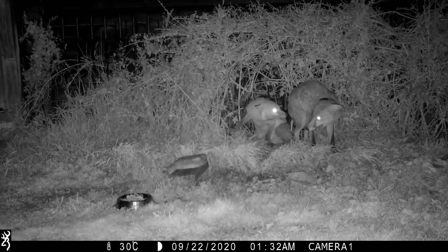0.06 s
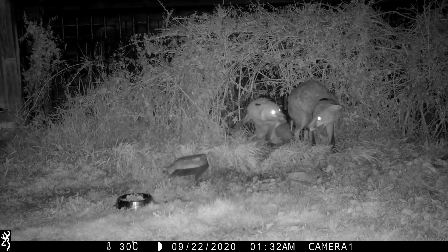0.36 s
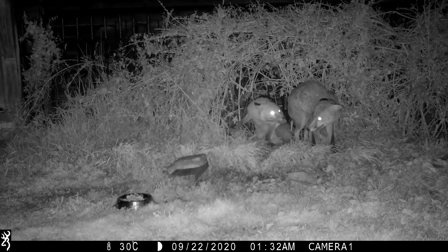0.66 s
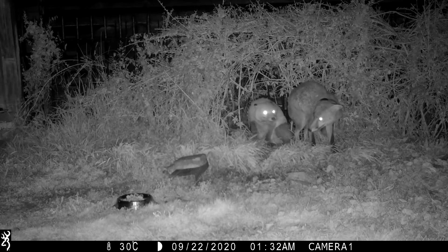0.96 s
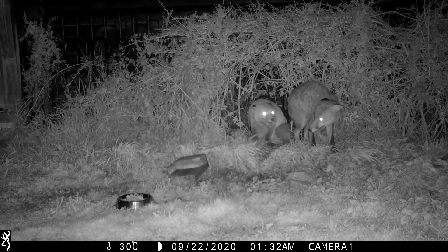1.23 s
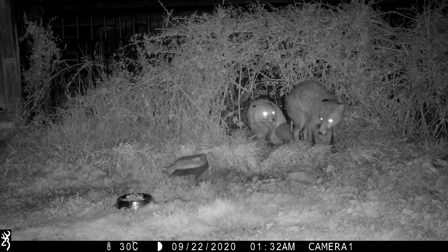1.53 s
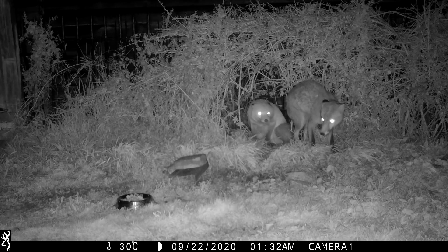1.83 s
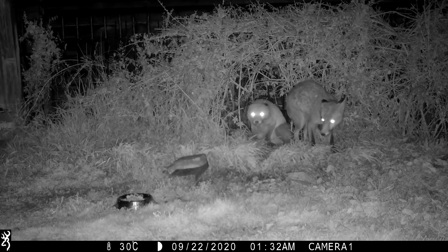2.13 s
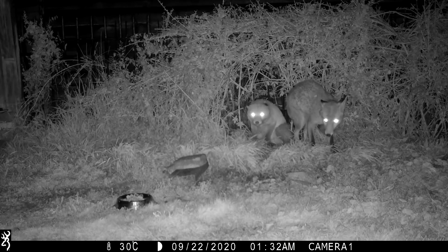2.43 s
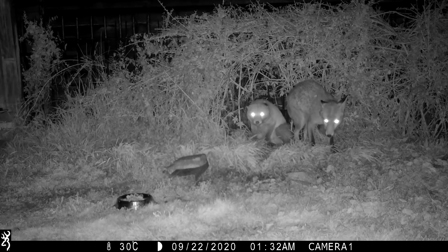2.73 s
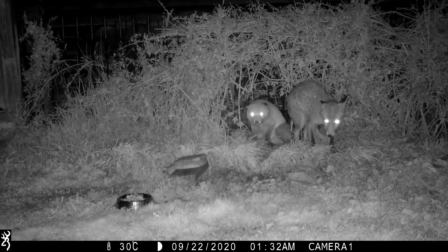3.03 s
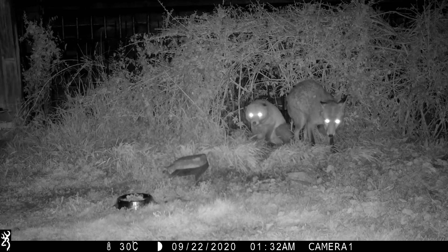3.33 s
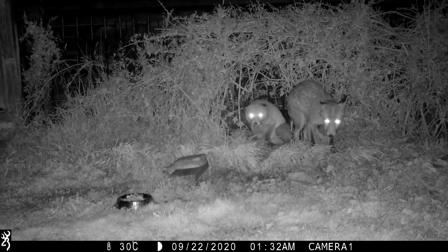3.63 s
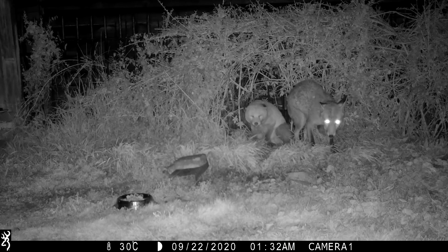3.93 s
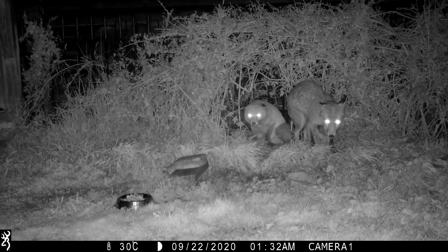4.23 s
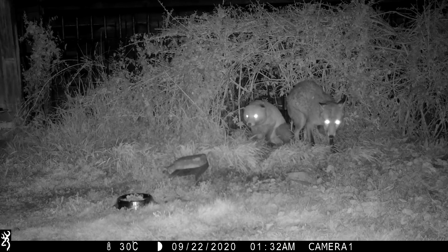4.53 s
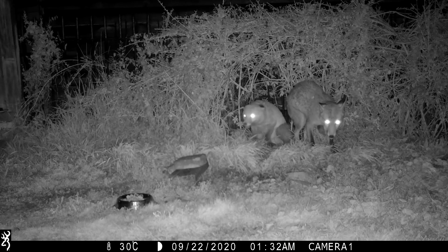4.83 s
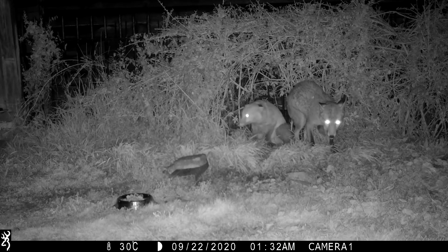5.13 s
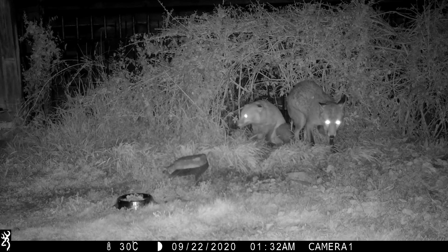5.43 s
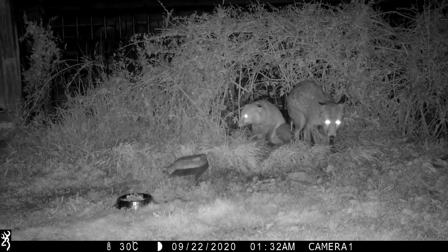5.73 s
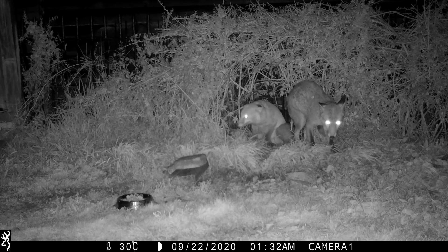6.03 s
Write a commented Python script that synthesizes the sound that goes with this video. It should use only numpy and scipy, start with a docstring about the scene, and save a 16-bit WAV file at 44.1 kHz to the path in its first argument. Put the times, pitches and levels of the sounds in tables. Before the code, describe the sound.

Two foxes squabble with high, wavering whines, sharp yelps and breathy huffs over a faint night hush.

```python
"""Two foxes squabble in a garden at night, their vocal folds singing high, wavering, fluttering whines.
A first whine ends in a huff of air spat through the jaws; a yelp breaks into rasp and a whimper follows.
After another huff and a second yelp comes the longest whine, and a few last huffs trail away.
Throughout, fence and hedge echo them over a faint hush, and a trail camera's electronics whistle thinly."""
import sys
import numpy as np
from scipy import signal
from scipy.fft import rfft, irfft, next_fast_len
from scipy.io import wavfile
from scipy.ndimage import map_coordinates

SR = 44100
rng = np.random.default_rng(int(sys.argv[2]) if len(sys.argv) > 2 else 0)


def store_pcm(level_fs):
    """Save levels as 16-bit WAV."""
    pcm = np.round(np.clip(level_fs, -1, 1) * 32767).astype(np.int16)
    wavfile.write(sys.argv[1], SR, np.atleast_2d(pcm).T)


N = 276330
TIME = np.arange(N) / SR


def whines():
    """An opening whine and a whimper through nearly shut jaws, then a long whine with the jaws parted."""
    # melody of each call: time_s, pitch_hz
    opening_pitch = [(0.012, 950.0), (0.064, 1140), (0.122, 1207), (0.258, 1027), (0.38, 1092),
                     (0.55, 1112), (0.624, 962), (0.646, 893), (0.724, 894)]
    whimper_pitch = [(1.417, 1050), (1.461, 1016), (1.535, 904), (1.613, 965), (1.657, 950.1), (1.689, 888),
                     (1.731, 934), (1.861, 1020), (2.035, 827), (2.055, 769.1)]
    long_pitch = [(3.3, 1037), (3.36, 1005), (3.42, 1076), (3.45, 1049), (3.6, 1097), (3.68, 1085),
                  (3.74, 1016), (3.86, 1003), (3.92, 1019), (3.97, 947), (3.98, 943), (4.02, 1164),
                  (4.05, 1181), (4.21, 1021), (4.37, 1081), (4.44, 983.3), (4.62, 1024), (4.72, 907),
                  (5.0, 831.9), (5.01, 802), (5.1, 906), (5.18, 1020), (5.28, 952), (5.3, 926), (5.31, 869),
                  (5.36, 856.4), (5.44, 885), (5.48, 811), (5.5, 770)]
    # swell of each call: time_s, low_db (harmonics 1 and 2), high_db (harmonics 3 and 4)
    opening_swell = [(0.025, -50.5, -61), (0.075, -44.5, -72.5), (0.113, -37, -47), (0.151, -37.5, -43),
                     (0.283, -40.5, -69.5), (0.351, -44, -73.5), (0.519, -44, -65), (0.651, -56, -82),
                     (0.7, -65, -63)]
    whimper_swell = [(1.417, -43, -74), (1.471, -42, -63), (1.531, -51.5, -58), (1.661, -44.5, -59),
                     (1.721, -74, -61), (1.749, -52.5, -70), (1.861, -39.5, -56.5), (2.049, -58, -50.5),
                     (2.055, -67, -62)]
    long_swell = [(3.3, -42, -56), (3.36, -48.5, -65), (3.4, -39, -39.5), (3.46, -38.5, -37.5),
                  (3.69, -42.5, -43.5), (3.7, -47.5, -29.5), (3.72, -33.5, -40), (3.87, -51, -46),
                  (3.89, -38, -40), (3.99, -47, -64), (4.07, -36.5, -36), (4.35, -37.5, -42.5),
                  (4.37, -36.5, -41), (4.39, -39, -33.5), (4.49, -44.5, -58), (4.51, -42.5, -44),
                  (4.7, -42.5, -45.5), (4.8, -54, -46), (4.92, -48.5, -41.5), (4.98, -54, -67),
                  (5.07, -51, -52.5), (5.14, -47.5, -58.5), (5.26, -39.5, -39.5), (5.44, -53.5, -51.5),
                  (5.48, -44.5, -48), (5.5, -61, -57)]
    # throat resonances: frequency_hz, gain_db
    jaws_shut = [(850, -8), (1200, 3.5), (1720, -10), (2000, 4), (2400, 6.5), (2600, 15), (2900, -3),
                 (3300, -10.5), (3550, 5.5), (4000, -6), (4400, -9.5), (4800, -12.5)]
    jaws_parted = [(800, 1.5), (1050, -2.5), (1200, 5.5), (1720, -6.5), (1950, 3), (2050, -8), (2300, 5),
                   (2600, 5), (3200, -5), (3550, -7.5), (4000, -15), (4350, -16), (4750, -17)]
    return (whine(opening_pitch, opening_swell, jaws_shut, pierce_db=-2, easy_rough=0.42)
            + whine(whimper_pitch, whimper_swell, jaws_shut, pierce_db=-12, easy_rough=0.52)
            + whine(long_pitch, long_swell, jaws_parted, pierce_db=-1.1, easy_rough=0.26))


def whine(pitch, swell, throat, pierce_db, easy_rough, flicker_db=3.5, air_db=-15, sag=0.03, sag_s=0.018):
    """Vocal folds sing a nearly pure harmonic stack; under strain a flutter shakes level and pitch."""
    # piercing top, relative to the fourth harmonic: frequency_hz, gain_db
    overtones = [(4200, 0.5), (4750, 2), (5100, -20.5), (6300, -29), (7500, -41), (8600, -40.5),
                 (9700, -31.5), (10800, -45)]
    # the voice cracks to the octave below: centre_s, half_length_s, share
    cracks = [(1.822, 0.0045, 0.93), (5.063, 0.016, 0.5)]
    # breath colour: frequency_hz, gain_db
    breath = [(500, -18), (1000, -17), (1500, -3), (2400, 20.5), (3200, 11), (4800, 7.5),
              (5300, -31.5), (7500, -35), (9700, -22), (12000, -30.5)]
    at = span(pitch)
    t = TIME[at]
    hz, = curves(pitch, t)
    hz *= 1 - sag * np.exp((t - t[-1]) / sag_s)  # the pitch flicks down as the pressure runs out
    flutter_hz, depth, rough = strain(t, easy_rough)
    flutter = turn(flutter_hz * (1 + 0.1407 * wander(50, t)))
    vibrato = 0.041 * depth * np.cos(flutter)
    jitter = 0.017 * rough * wander(700, t)
    waver = 0.0045 * wander(45, t)
    phase = turn(hz * (1 + vibrato + jitter + waver))
    low_db, high_db = curves(swell, t)
    gains = harmonic_pair(low_db, throat, hz, 2 * hz) + harmonic_pair(high_db, throat, 3 * hz, 4 * hz)
    gains += [gains[3] * undb(pierce_db) * response(overtones, k * hz) for k in range(5, 12)]
    # each harmonic flickers as head and jaws move; the throat delays each by its own amount
    tone = sum(gain * undb(flicker_db * wander(34.65, t)) * np.sin(k * phase + k ** 2)
               for k, gain in enumerate(gains, 1))
    crack = sum(share * bump(t, centre_s, half_s) for centre_s, half_s, share in cracks)
    tone = np.sqrt(2) * (tone + crack * gains[0] * np.sin(phase / 2))
    # air escapes once a cycle, more of it from a rough throat
    puffs = rng.standard_normal(len(t)) * (1 + np.cos(phase))
    air = colour(puffs, breath) * rough * undb(air_db) * np.linalg.norm(gains, axis=0)
    throb = 1 + depth * np.sin(flutter)
    shimmer = 1 + 0.28 * rough * wander(250, t)
    out = np.zeros(N)
    out[at] = (tone + air) * throb * shimmer * fade(t, edge_s=0.0036)
    return out


def strain(t, easy_rough, easy_flutter=0.038):
    """Flutter rate, flutter depth and roughness of a throat that tightens in fits."""
    # fits of strain: centre_s, half_length_s, flutter_hz, added_depth, added_roughness
    fits = [(0.15, 0.11, 115.6, 0.36, 0.26), (0.421, 0.16, 89.6, 0.59, 0.13),
            (2.033, 0.21, 75.75, .25, 0.1), (3.333, 0.15, 78.7, 0.2, .22), (4.058, 0.067, 85.8, 0, 0.28),
            (4.629, 0.11, 82.6, 0.25, 0.29), (5.215, 0.083, 69.5, 0.25, 0.1),
            (5.304, 0.078, 76, 0.37, 0.88), (5.489, 0.021, 86, 0.1, 1)]
    centre_s, half_s, flutter_hz, depth, rough = np.transpose(fits)
    swells = bump(t[:, None], centre_s, half_s)
    return np.interp(t, centre_s, flutter_hz), easy_flutter + swells @ depth, easy_rough + swells @ rough


def harmonic_pair(db, throat, low_hz, high_hz):
    """Two neighbouring harmonics share a level as the throat favours them."""
    gains = response(throat, np.array([low_hz, high_hz]))
    return list(undb(db) * gains / np.linalg.norm(gains, axis=0))


def yelps():
    """Two yelps, each a quick run of air pushes through an open mouth."""
    # pushes of each yelp: start_s, rise_s, hold_s, decay_s, level_db, full_pitch_hz, clean_s
    runs = [
        [(1.206, 0.0066, 0.00081, 0.0096, -22.5, 1326, 0.046), (1.229, 0.0072, .002, 0.0046, -10, 1252, 0.013),
         (1.247, 0.004, 0.0013, 0.0087, -16.5, 994, .001), (1.263, .004, .001, 0.0049, -17.5, 986, .003)],
        [(3.114, 0.0083, 0.00091, 0.014, -21.5, 1048, .022), (3.137, 0.018, 0.0033, 0.01, -17, 956.6, 0.018),
         (3.169, 0.0036, 0.0025, 0.0076, -23.5, 944, 0.0014)],
    ]
    # mouth resonances of each yelp: frequency_hz, gain_db
    mouths = [
        [(330, -35.5), (500, -24), (950, -13.5), (1300, -20), (1950, 0.5), (2500, 0), (3100, -5.5), (3750, -22),
         (4400, -27.5), (5200, -44), (7000, -61), (9300, -63), (12000, -67.5)],
        [(330, -39), (500, -17), (950, -6.5), (1350, -9), (1950, 8.5), (2500, 1), (3150, 1), (3800, -8),
         (4400, -15.5), (5200, -37), (7000, -48), (9600, -49.5), (12000, -60.5)],
    ]
    return sum(squeak(push, mouth) for pushes, mouth in zip(runs, mouths) for push in pushes)


def squeak(push, mouth, slack=0.07, break_s=0.004, jitter=0.084, rasp=0.95, stutter_hz=140):
    """One push of a yelp: pitch follows pressure, and the voice breaks into period doubling and rasp."""
    start_s, rise_s, hold_s, decay_s, level_db, full_pitch_hz, clean_s = push
    at = int(start_s * SR) + np.arange(SR // 8)
    age = TIME[at] - TIME[at[0]]
    attack = np.minimum(age / rise_s, 1)
    pressure = attack * np.exp(-np.maximum(age - rise_s - hold_s, 0) / decay_s)
    hz = full_pitch_hz * (1 - slack * (1 - np.sqrt(pressure)))
    broken = (1 + np.tanh((age - clean_s) / break_s)) / 2
    rough = 0.21 + 0.49 * broken
    phase = turn(hz * (1 + jitter * rough * wander(900, age)))
    # strong and weak cycles alternate, which puts partials halfway between the harmonics
    orders = np.arange(1, 21)[:, None] / 2
    gains = response(mouth, orders * hz) * np.where(orders % 1, 0.97 * broken, 1)
    partials = gains * np.sin(orders * phase + orders ** 2)
    tone = np.sqrt(2) * partials.sum(axis=0) / np.linalg.norm(gains, axis=0)
    puffs = rng.standard_normal(len(age)) * (1 + 0.72 * np.cos(phase / 2))
    air = rasp * rough * colour(puffs, mouth)
    # the throat starts to stutter as the pressure peaks
    stutter = 1 + 0.36 * np.cos(2 * np.pi * stutter_hz * (age - rise_s)) * attack ** 2
    out = np.zeros(N)
    out[at] = (tone + air) / np.hypot(1, rasp * rough) * undb(level_db) * pressure * stutter
    # the yelp carries no bass below about 350 Hz
    return signal.sosfilt(signal.butter(4, 350, "highpass", fs=SR, output="sos"), out)


def huffs(sputter_db=2.5):
    """Voiceless spits: sputtering bursts of air through the open jaws."""
    # bursts of breath: start_s, level_db, rise_s, decay_s
    bursts = [(0.729, -37.5, 0.006, 0.025), (2.626, -46.5, 0.026, 0.023), (3.299, -50, 0.011, 0.011),
              (3.878, -45.5, 0.0029, 0.046), (5.495, -49.5, 0.034, 0.032), (5.72, -60, 0.022, 0.031),
              (6.135, -56.5, 0.011, 0.051)]
    # colour of air rushing through the jaws: frequency_hz, gain_db
    rush = [(120, -19.5), (350, -15), (580, -1), (900, -11.5), (1400, -11.5), (2000, 0), (2600, 1.5),
            (3200, -3.5), (3800, -1), (4850, -10.5), (5300, -20), (7300, -41), (9700, -37.5), (12000, -50)]
    blow = 0
    for start_s, level_db, rise_s, decay_s in bursts:
        age = np.maximum(TIME - start_s, 0)
        attack = np.sqrt(np.minimum(age / rise_s, 1))
        blow += undb(level_db) * attack * np.exp(-np.maximum(age - rise_s, 0) / decay_s)
    return blow * noise(rush, size=N) * undb(sputter_db * wander(300, TIME))


def garden(x, scatter_db=-13, t60_s=0.22, build_s=0.036):
    """Direct sound, a few distinct echoes and a short wash scattered by the bushes."""
    # slaps off fence, shed and hedge: delay_s, level_db
    echoes = [(.008, -22.5), (0.0369, -14), (.057, -31.5), (0.074, -39), (.095, -39.5)]
    t = TIME[:SR // 2]
    wash = noise([(300, 5.5), (2500, -7.5), (4500, -5.5), (10000, -12)], size=len(t))
    wash *= undb(-60 * t / t60_s) * (1 - np.exp(-t / build_s))
    impulse = undb(scatter_db) * wash / np.linalg.norm(wash)
    impulse[0] += 1  # direct sound
    for delay_s, level_db in echoes:
        impulse += undb(level_db) * np.sinc((t - delay_s) * SR / 2) / 2
    return signal.fftconvolve(x, impulse)[:N]


def night(level_db=-58, swell_db=0.63):
    """The faint, gently swelling hush of the neighbourhood."""
    # colour of the hush: frequency_hz, gain_db
    hush = [(15, -42.5), (30, -19), (50, -12), (80, -14), (150, -7), (250, -5.5), (400, -2.5), (700, -2),
            (1000, -3), (1500, -4.5), (2400, -9.5), (3700, -17), (4900, -26), (5400, -38)]
    return noise(hush + [(9000, -72.5)], size=N) * undb(level_db + swell_db * wander(3.1, TIME))


def camera(whistle_hz=7797, flip_hz=29.85, whistle_db=-79, octave_db=-96, hiss_db=-84):
    """A thin electronic whistle and its faint octave, over preamplifier hiss."""
    flips = np.sign(np.cos(2 * np.pi * flip_hz * TIME)) + 0.22  # sign and size switch twice a cycle
    phase = 2 * np.pi * whistle_hz * TIME
    whistle = undb(whistle_db) * flips * np.sin(phase) + undb(octave_db) * np.sin(2 * phase)
    hiss = noise([(5000, 1), (9800, -0.32), (10500, -2.4), (15000, -2)], size=N)
    return np.sqrt(2) * whistle + undb(hiss_db) * hiss


def undb(db):
    """Decibels to gain."""
    return 10 ** (np.asarray(db) / 20)


def curves(table, t):
    """Each column after time_s, joined by straight lines over the times t."""
    time_s, *columns = np.transpose(table)
    return [np.interp(t, time_s, column) for column in columns]


def response(points, hz):
    """Gain of a (frequency_hz, gain_db) curve at the given frequencies."""
    frequency_hz, gain_db = np.transpose(points)
    return undb(np.interp(np.log(hz + 1), np.log(frequency_hz), gain_db))


def colour(x, points):
    """Shape a sound with a (frequency_hz, gain_db) curve, at rms 1."""
    n = next_fast_len(len(x) + 512)
    shaped = irfft(rfft(x, n) * response(points, np.fft.rfftfreq(n, 1 / SR)), n)[:len(x)]
    return shaped / np.sqrt(np.mean(shaped ** 2))


def noise(points, size):
    """Noise with a (frequency_hz, gain_db) colour, at rms 1."""
    return colour(rng.standard_normal(size), points)


def wander(rate_hz, t):
    """Smooth random drift of spread about 1, with rate_hz new values a second."""
    steps = rng.standard_normal(16384)
    return map_coordinates(steps, [(t - t[0]) * rate_hz], order=3, mode="wrap")


def span(table):
    """Sample numbers from the first to the last row of a table."""
    return np.arange(max(int(table[0][0] * SR), 0), min(int(table[-1][0] * SR), N))


def fade(t, edge_s):
    """Soft start and stop of a call."""
    return np.clip(np.minimum(t - t[0], t[-1] - t) / edge_s, 0, 1)


def bump(t, centre_s, half_s):
    """A smooth swell of height 1."""
    return np.exp(-((t - centre_s) / half_s) ** 2)


def turn(hz):
    """Phase of an oscillator with a moving frequency."""
    return 2 * np.pi * np.cumsum(hz) / SR


def scene(whine_db=-1, mic_top_hz=10400):
    """Whines, yelps and huffs in the garden, over the night hush and the camera's whistle."""
    foxes = undb(whine_db) * whines() + yelps() + huffs()
    outdoors = garden(foxes) + night()
    # the microphone in its weatherproof case takes in no high treble
    heard = signal.sosfilt(signal.cheby1(6, 0.5, mic_top_hz, fs=SR, output="sos"), outdoors)
    return (heard + camera())[None]


def record(dry):
    """The camera cuts the top steeply above 15.7 kHz."""
    return signal.sosfilt(signal.ellip(8, 0.2, 70, 15700, fs=SR, output="sos"), dry)


dry = scene()
out = record(dry)
store_pcm(out)
```